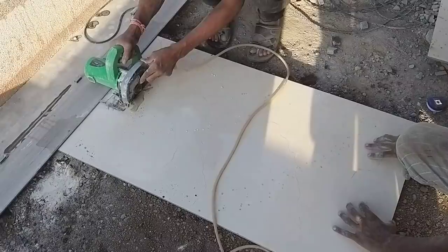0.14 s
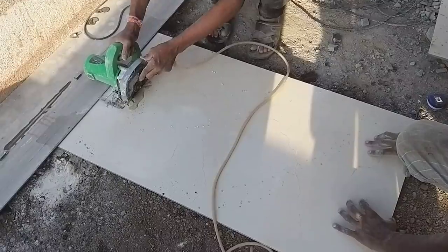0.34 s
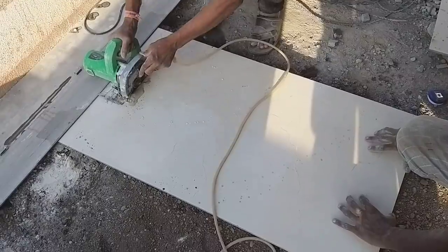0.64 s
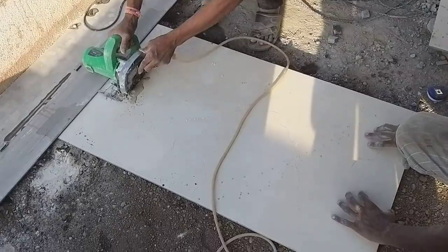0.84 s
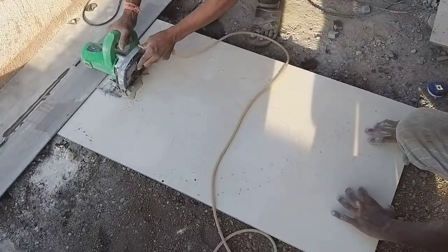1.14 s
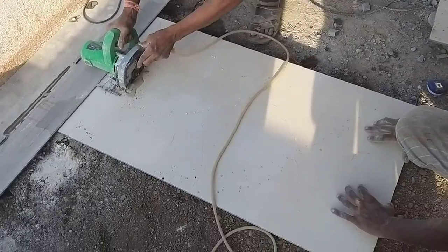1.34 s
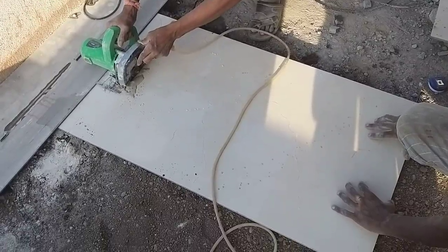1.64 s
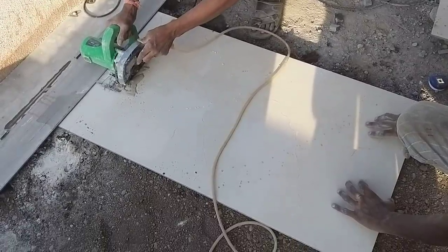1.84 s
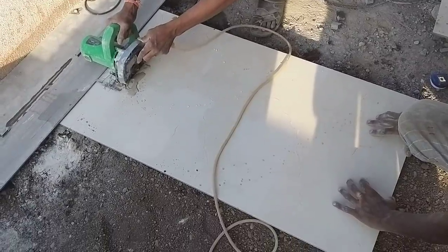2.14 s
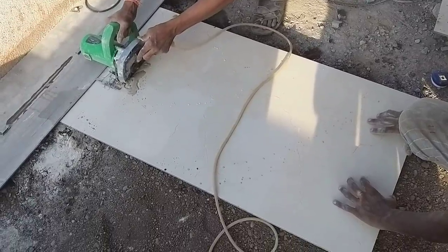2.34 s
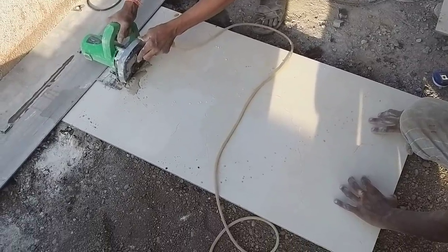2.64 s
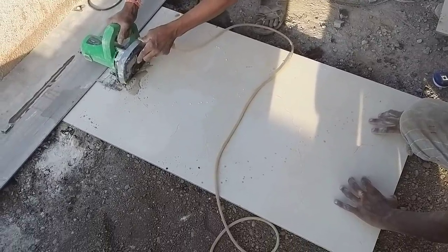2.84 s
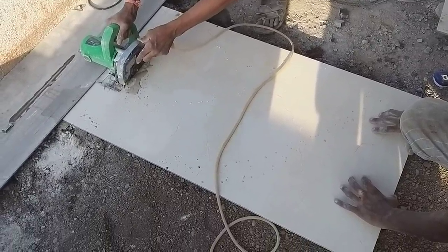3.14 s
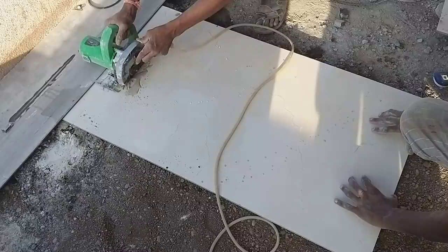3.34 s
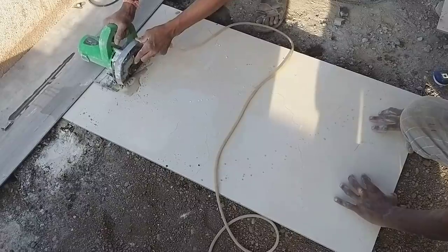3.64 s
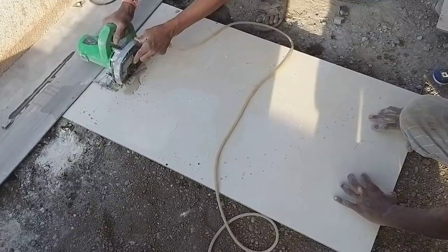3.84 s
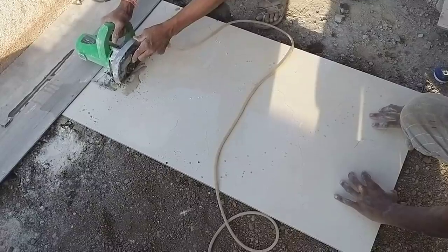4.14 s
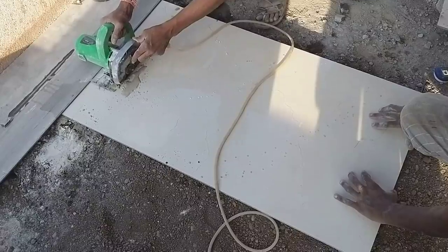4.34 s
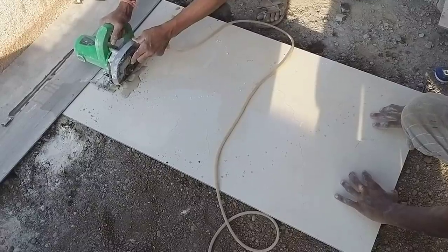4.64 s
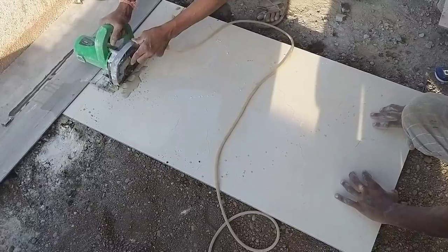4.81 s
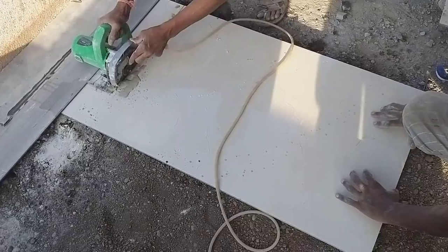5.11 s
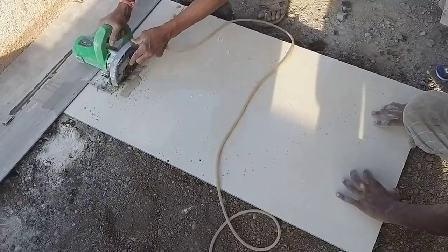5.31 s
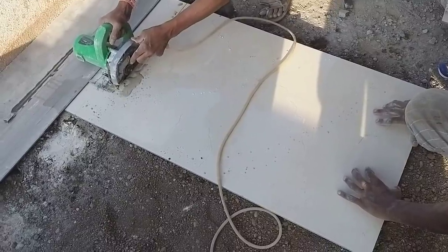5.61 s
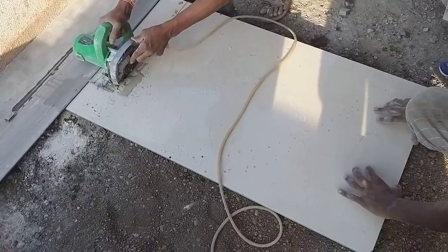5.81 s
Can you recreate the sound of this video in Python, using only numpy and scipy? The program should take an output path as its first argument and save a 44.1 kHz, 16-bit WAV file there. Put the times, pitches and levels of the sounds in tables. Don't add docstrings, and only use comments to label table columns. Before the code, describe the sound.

A handheld electric cutter grinds steadily through a large tile, a loud harsh metallic whine with dense hiss and crackling overload, heard close up.

```python
import sys
import numpy as np
from scipy import signal
from scipy.fft import rfft, irfft, next_fast_len
from scipy.io import wavfile
from scipy.ndimage import uniform_filter1d

SR = 44100
rng = np.random.default_rng(int(sys.argv[2]) if len(sys.argv) > 2 else 0)


def how_loud(loudness_db):
    steps = np.asarray(loudness_db, float) / 20
    return 10 ** steps


def store_wav(level_fs):
    pcm = np.round(np.clip(np.atleast_2d(level_fs), -1, 1) * 32767)
    wavfile.write(sys.argv[1], SR, pcm.T.astype(np.int16))


N = 263277
TIME, SIZE = np.arange(N) / SR, next_fast_len(N)
HZ = np.arange(SIZE // 2 + 1) * SR / SIZE
JUMP_S = 0.335
DEPTH = TIME / TIME[-1] - 0.5


def curve(table):
    start_s, value = np.transpose(table)
    return np.interp(TIME, start_s, value)


def unit(x):
    return x / np.sqrt(np.mean(x ** 2))


def colour(x, points):
    pitch_hz, level_db = np.transpose(points)
    gain = how_loud(np.interp(np.log(HZ + 1), np.log(pitch_hz), level_db))
    return unit(irfft(rfft(x, SIZE) * gain, SIZE)[..., :N])


def walk(rate_hz, count=1):
    block = 64
    size, hold = N // block + 1, max(int(SR / block / rate_hz), 1)
    steps = np.repeat(rng.standard_normal((count, size // hold + 1)), hold, axis=1)
    smooth = uniform_filter1d(uniform_filter1d(steps, hold), hold)
    return 1.18 * np.repeat(smooth[:, :size], block, axis=1)[:, :N]


def rim(turn):
    wear_db, wear_turns = 2.2, 40
    turns, orders, points = int(turn[-1]) + 2, 88, 1024
    wear = rng.standard_normal((2, turns, orders))
    wear = uniform_filter1d(wear, wear_turns, axis=1) * np.sqrt(wear_turns)
    angle = 2 * np.pi * rng.random(orders) + 0.33 * wear[1]
    pattern = irfft(how_loud(wear_db * wear[0]) * np.exp(1j * angle), points).ravel()
    return unit(np.interp(turn * points, np.arange(pattern.size), pattern))


# pitch_hz, width_hz, grit_db, rim_db, depth_db (gain by full depth of cut), lead_rad (right port leads)
LOW_BLADE_MODES = [(2255, 420, -12.5, -10.5, 3.5, 1.76), (2830, 110, -12, -21, -7, -0.5),
                   (3560, 110, -2, -39, -2.5, -1.83), (3927, 213, -2.5, -4, -10, -2),
                   (4235, 83, -1.5, -13, 5.5, 2.5), (4560, 86, -16, -18, 10, -2),
                   (4744, 157, 2.5, 3.5, -1, -1.94), (5070, 200, -14.5, -9, 1, -1),
                   (5544, 130, -6, -6, -0.5, 1.76), (5790, 59, -9, -21, -5, 5.5),
                   (6110, 95, -5.5, -6.5, 5.5, 2.5), (6495, 185, -8.5, -6, -1, 1),
                   (6320, 29, -18, -15.5, 3, 1.5)]
HIGH_BLADE_MODES = [(6964, 320, -18, -11, 3, 1.5), (7790, 370, -11, -21, -8, 1.7),
                    (9090, 380, -12.5, -30, -3, 0.83), (9566, 244, 0.5, -26, 0, -0.8),
                    (10690, 520, -11, -17, -1, 1.1), (11490, 350, -2, -17, 0, -0.7),
                    (11840, 180, -2, -6, -3, -2.5), (12410, 340, -8.5, -14, -2, -2),
                    (12790, 410, 0, -12, 0, -1.5), (13760, 170, -3.5, -8, -5, -1.5),
                    (14170, 240, -8, -11, -6, 4), (15100, 300, -0.5, -10, -2, -2.5),
                    (15100, 300, -13, -22, 4, -5)]
BLADE_MODES = LOW_BLADE_MODES + HIGH_BLADE_MODES
# level_db (against the grinding), depth_db (gain by full depth of cut), early_db (before the jump)
STRONG_MODES = [
    (-13, -4, -6),
    (-14.5, -1.5, 4.5),
    (-13.5, 6, 6.5),
    (-14, -10.5, 3.5),
    (-11.5, 8, -2),
]
STRONG_ROWS = (2, 6, 16, 18, 21)


def blade(turn):
    shared = 0.79
    throb, drift_db, flicker_db = 0.086, 1.5, 1.5
    bite = 1 + throb * np.cos(2 * np.pi * turn) + throb * np.cos(4 * np.pi * turn)
    grit = rfft(bite * rng.standard_normal((3, N)), SIZE)
    pattern = rfft(rim(turn), SIZE)
    strong = dict(zip(STRONG_ROWS, STRONG_MODES))
    out = np.zeros((2, N))
    for row, (pitch_hz, width_hz, grit_db, rim_db, depth_db, lead_rad) in enumerate(BLADE_MODES):
        ring = 1 / (1 + (2.07 * (HZ - pitch_hz) / width_hz) ** 2)
        direct = np.sqrt(shared) * how_loud(grit_db) * grit[0] + how_loud(rim_db - 5.0) * pattern
        scattered = np.sqrt(1 - shared) * how_loud(grit_db) * grit[1:]
        ports = direct * np.exp(1j * np.array([[0], [lead_rad]])) + scattered
        mode = irfft(ring * ports, SIZE)[:, :N] * how_loud(flicker_db * walk(25.0))
        if row in strong:
            strong_db, strong_depth_db, early_db = strong[row]
            level_db = strong_db + strong_depth_db * DEPTH + early_db * (TIME < JUMP_S) + 1.2 * walk(4.0)
            out += unit(mode) * how_loud(level_db + grit_db)
        else:
            out += mode * how_loud(depth_db * DEPTH + drift_db * walk(2.09) + 9.0)
    return out


# pitch_hz, level_db (per Hz)
DUST_HISS = [(1500, -36), (2500, -2.5), (3300, 2), (4300, -1.5), (5300, -1.5), (6800, -11.5), (7350, -13),
             (7900, -2.5), (8500, -13), (9900, -4.5), (11000, -5), (13400, -4), (14600, -7.5), (15800, -5)]


def dust():
    flicker = how_loud(1.1 * walk(37.0))
    return colour(rng.standard_normal((2, N)) * flicker, DUST_HISS) * how_loud(-5.5)


# start_s, length_s, level_db, lead_rad (right port leads)
SINGING = [(-.04, .36, -28, -1), (-.04, .36, -26.5, 1.8), (-.04, .36, -28.5, -1.3), (-.04, .36, -28, .4),
           (.38, .19, -30, -1), (.42, .18, -29, 1), (.34, .22, -31, .4), (.55, .22, -30, -1.6),
           (.85, .07, -29, -1.6), (1.06, .07, -30, -1.6), (1.32, .63, -28, -1.3), (1.27, .2, -30.5, -1),
           (1.72, .27, -32, -1.5), (2.08, .58, -29, -1.2), (2.1, .3, -30, .3), (2.4, 1.3, -28.5, -1.8),
           (2.45, .3, -28, -2.3), (2.75, 1.75, -30, -2.3), (2.75, 1.2, -29, 2.5), (2.7, .7, -35, .5),
           (3.4, 1.3, -33, 0), (3.86, .9, -29.5, -.3), (3.86, .25, -28, -.4), (3.86, .75, -33, -.5),
           (4.26, .9, -26.5, -.4), (3.95, 1.1, -29, 0), (5.1, .9, -24, .2), (5.26, .75, -27.5, -1.5),
           (5.16, .85, -27, .5), (2.9, 1.3, -35, 1.4)]
SINGING_MULTIPLES = (16, 23, 25, 53, 16, 26, 53, 20, 24, 22, 19, 26, 15, 19, 52, 26, 64, 65, 23, 37, 36, 19,
                     26, 25, 26, 53, 52, 19, 26, 30)


def whine(turn):
    swell_s = 0.04
    out = np.zeros((2, N))
    wobble_rad = 0.3 * walk(30.0, count=8)
    flicker_db = 2.2 * walk(20.0, count=4)
    for k, ((start_s, length_s, level_db, lead_rad), multiple) in enumerate(zip(SINGING, SINGING_MULTIPLES)):
        end_s = start_s + length_s
        part = slice(max(int((start_s - swell_s) * SR), 0), int((end_s + swell_s) * SR))
        t = TIME[part]
        shape = np.clip(np.minimum(t - start_s, end_s - t) / swell_s / 2 + 0.5, 0, 1)
        angle = 2 * np.pi * multiple * turn[part] + np.array([[0], [lead_rad]])
        angle = angle + wobble_rad[[k % 4, 4 + k % 4], part]
        out[:, part] += np.sqrt(2) * how_loud(level_db + flicker_db[k % 4, part]) * shape * np.cos(angle)
    return out


# pitch_hz, level_db (per Hz)
CRACKLE_THUD = [(20, -35), (60, -5), (130, 1.5), (400, -0.5), (900, 0), (1100, -9), (1600, -41)]
# pitch_hz, level_db (per Hz)
CRACKLE_RASP = [(500, -44), (950, -8), (1150, 4.5), (1800, 3.5), (2600, -0.5), (4500, -22), (9000, -64)]


def crackle(bite_db):
    crackle_db, grain_db = -23, 3.1
    bass_open_db, bass_cut_db, bass_per_bite = 2, -11.2, 1.4
    burst_db = 2.9 * walk(50.0, count=2) + 0.5 * walk(30.0)
    size_db = grain_db * np.minimum(rng.exponential(size=(2, N)), 8.5)
    clicks = rng.standard_normal((2, N)) * how_loud(size_db + burst_db)
    thud_db = np.where(TIME < JUMP_S, bass_open_db - bite_db, bass_cut_db + (bass_per_bite - 1) * bite_db)
    side = np.array([[1], [-1]])
    rasp = how_loud(1.2 * side) * colour(clicks, CRACKLE_RASP)
    thud = how_loud(thud_db + 0.12 * side) * colour(clicks, CRACKLE_THUD)
    return how_loud(crackle_db + bite_db) * (rasp + thud)


# start_s, turns_hz
BLADE_SPEED = [(0, 179.4), (0.33, 179), (0.34, 174.9), (0.63, 183.3), (0.78, 174), (0.99, 152.7),
               (1.14, 167.3), (1.28, 179.5), (1.45, 184.8), (1.88, 189.6), (2.2, 186.2), (2.75, 181.1),
               (3.7, 181.3), (4.43, 180.8), (5.1, 181.7), (5.27, 184.7), (5.6, 184.7), (5.97, 184)]
# start_s, level_db
RIM_PRESSURE = [(0, -2), (0.3, -2), (0.48, 2), (0.8, -5), (1.03, -5.5), (1.2, -2.5), (1.88, -1.5),
                (2.1, 1.7), (2.33, 1.7), (2.48, -1), (3.05, 0.8), (3.7, -1.1), (4.2, -0.3), (4.58, 1),
                (4.75, 0.3), (5.25, 0), (5.8, 1.3), (5.97, 3)]


def scene():
    bite_db = curve(RIM_PRESSURE)
    turn = np.cumsum(curve(BLADE_SPEED)) / SR
    grind_db = -12 + 0.11 * bite_db + 1.1 * DEPTH - 2 * (TIME < JUMP_S)
    tool = how_loud(grind_db) * (blade(turn) + dust()) + whine(turn)
    ports = how_loud(np.array([[0.2], [-0.2]]))
    return tool * ports + crackle(bite_db)


def top_cut(x):
    return signal.sosfilt(signal.butter(12, 16220, fs=SR, output="sos"), x)


def record(dry):
    capped = np.clip(np.tanh(0.7 * dry) / 0.7, -0.82, 0.82)
    low_pass = np.clip((15740 - HZ) / 40, 0, 1)
    mix = irfft(rfft(capped, SIZE) * low_pass, SIZE)[:, :N]
    return top_cut(mix)


dry = scene()
out = record(dry)
store_wav(out)
```